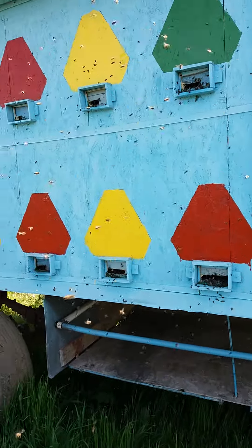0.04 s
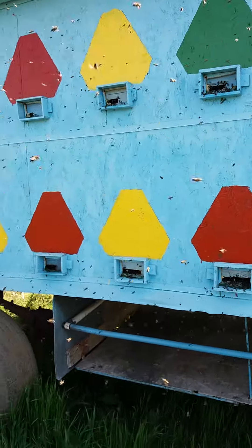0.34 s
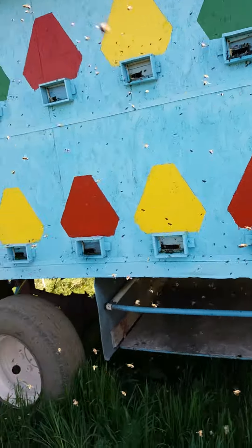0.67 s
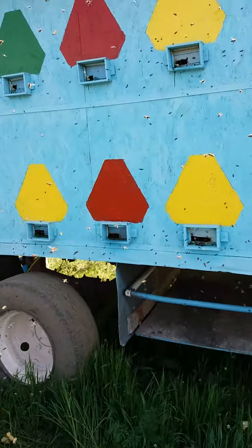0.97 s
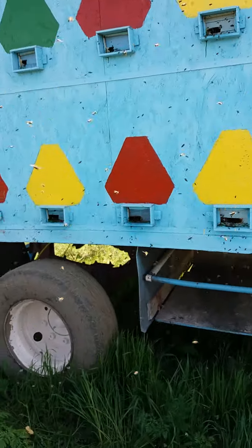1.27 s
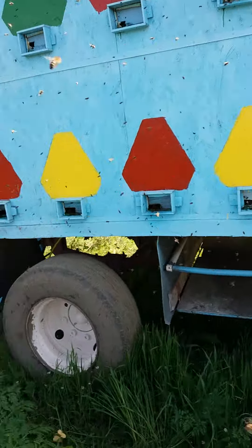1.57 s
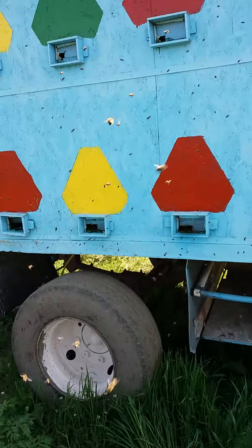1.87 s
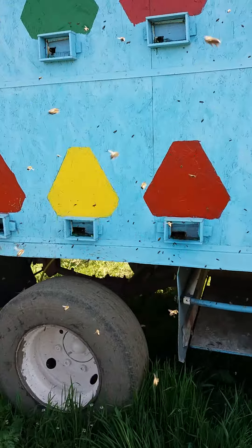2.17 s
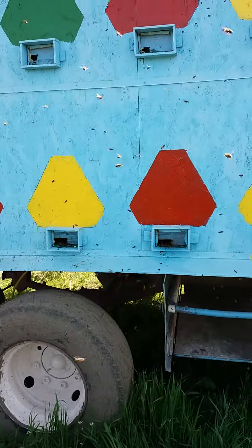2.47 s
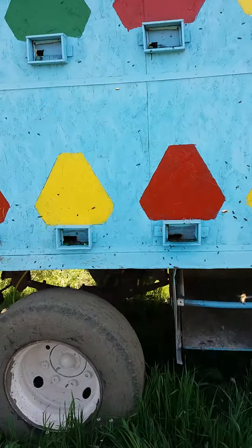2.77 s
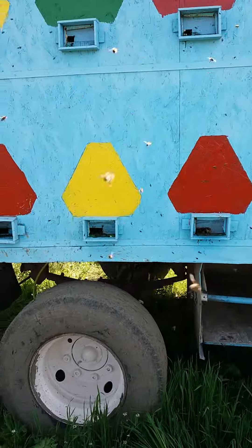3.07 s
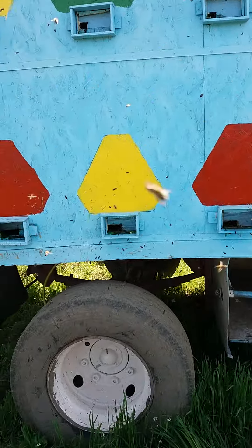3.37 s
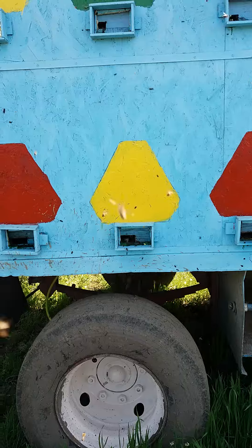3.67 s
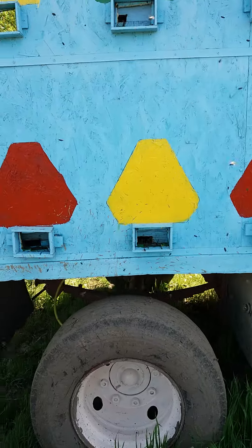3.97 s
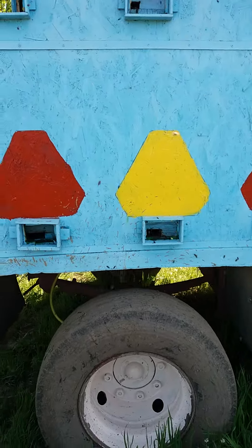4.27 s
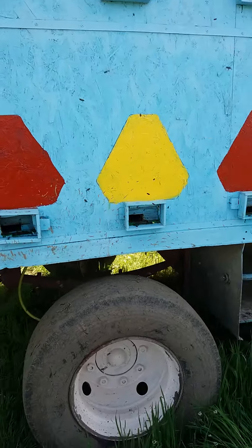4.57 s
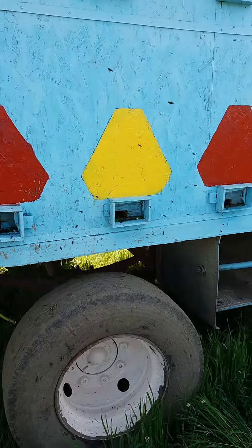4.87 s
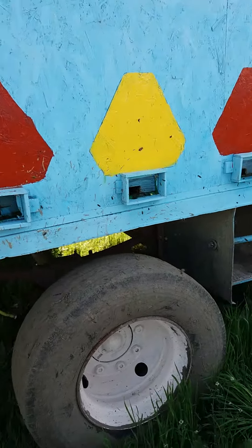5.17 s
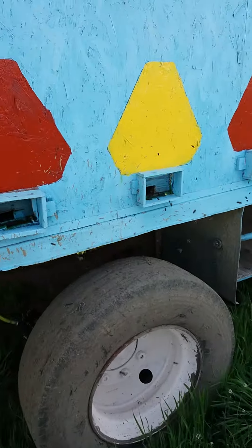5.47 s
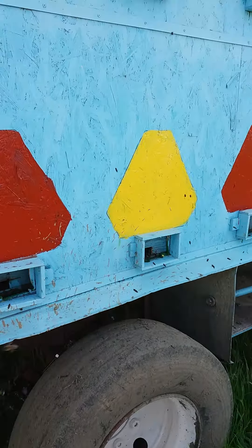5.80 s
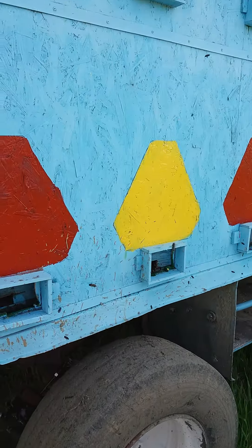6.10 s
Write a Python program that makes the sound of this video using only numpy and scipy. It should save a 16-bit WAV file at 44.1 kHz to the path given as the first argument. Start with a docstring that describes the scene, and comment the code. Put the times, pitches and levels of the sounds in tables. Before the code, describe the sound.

Many honeybees buzz throughout, around hive entrances in an open field, their wingbeats merging into one soft, wavering hum with a raspy edge. The buzz is fullest from about 0.8 to 2 seconds, then slowly thins and dulls toward 5 seconds, lifts slightly at 5.5 and eases again.

Handling noises sit right on the microphone. A short knock at 0.4 seconds leads to a deep thump at 0.6, by far the loudest sound. A sharp click comes at 1.4 seconds, a fainter one at 1.8, and a dull knock at 2.8. Between 4.2 and 4.6 seconds the case gives a quick cluster of clicks, the sharpest at 4.4. A few light knocks follow from 5.4 seconds to the end, at about 6. Very faint finger slides occur in between. Underneath are a light wind rumble with small gusts and a faint steady hiss.

```python
"""Honeybees swarm at the entrances of a hive trailer in an open field, heard from a hand-held camera.
Dozens of wingbeats blend into one hum, which thins as the camera moves along the trailer.
Fingers slide and knock on the camera, once with a deep thump, and its case clicks and rings.
Behind it all: light wind on the microphone and a steady hiss."""
import sys
import numpy as np
from scipy import signal
from scipy.fft import rfft, irfft, next_fast_len
from scipy.io import wavfile
from scipy.ndimage import uniform_filter1d

SR = 44100
rng = np.random.default_rng(int(sys.argv[2]) if len(sys.argv) > 2 else 0)


def transcribe(u):
    """Save the signal u as a 16-bit wav file named by the first command-line argument.

    u: samples, shape (n,) or (channels, n), limited to [-1, 1]; the rate is SR.
    q: integer samples, one column per channel.
    """
    v = np.clip(np.atleast_2d(u).T, -1, 1)
    q = np.round(v * 32767).astype(np.int16)
    wavfile.write(sys.argv[1], SR, q)


N = 270766
TIME_S = np.arange(N) / SR


def gain_of(db):
    """dB to amplitude."""
    return 10 ** (np.asarray(db) / 20)


def unit_rms(x):
    """Scale to rms 1."""
    return x / np.sqrt(np.mean(x ** 2) + 1e-20)


def bell(x, sigma):
    """Gaussian, peak 1."""
    return np.exp(-.5 * (x / sigma) ** 2)


def gain_at(spectrum, hz):
    """Amplitude of a dB spectrum, interpolated over log frequency."""
    points_hz, points_db = np.transpose(spectrum)
    return gain_of(np.interp(np.log(hz + 1), np.log(points_hz + 1), points_db))


def add(mix, at_s, sound):
    """Mix in at at_s."""
    part = mix[round(at_s * SR):][:len(sound)]
    part += sound[:len(part)]


def cut(x, hz, kind, order=2):
    """Causal Butterworth low- or high-pass."""
    return signal.sosfilt(signal.butter(order, hz, kind, fs=SR, output="sos"), x)


def drift(t, slow_hz, fast_hz, count=14):
    """Random wander from summed sines, rms 1."""
    hz = np.geomspace(slow_hz, fast_hz, count)[:, None]
    sines = np.sin(2 * np.pi * (hz * t + rng.random((count, 1))))
    return unit_rms((sines / np.sqrt(hz)).sum(0))


def noise(spectrum):
    """Coloured noise, rms 1."""
    size = next_fast_len(N)
    colour = gain_at(spectrum, np.fft.rfftfreq(size, 1 / SR))
    return unit_rms(irfft(rfft(rng.standard_normal(size)) * colour, size)[:N])


# Hiss spectrum: f/Hz, relative density/dB
HISS_SPECTRUM = [(500, 0), (2000, 6.5), (3100, 6), (4500, 1.5), (6000, -6.5), (7500, -8.5), (9500, -6),
                 (12000, -1.5), (14000, 1), (15500, 2)]

def hiss(level_db=-72.0):
    """Steady hiss of the microphone and of grass rustling in the distance."""
    return gain_of(level_db) * noise(HISS_SPECTRUM)


# Wind spectrum: f/Hz, relative density/dB
WIND_SPECTRUM = [(20, -27), (35, -24), (50, -5.5), (68, 0.5), (100, -3), (140, -4), (250, -10.5),
                 (600, -16.5), (2000, -51.5)]
# Gusts: t/s, rise/dB
WIND_GUSTS = [(0.02, 7.5), (0.6, 6), (0.83, 4.5), (1.7, 3), (2.75, 2), (5.36, 3.5), (6.13, 5)]

def wind(base_db=-60.3, flutter_db=1.74, gust_sigma_s=0.072):
    """Breeze on the microphone: uneven rumble with a few gusts."""
    t = TIME_S[::256]
    gusts_db = sum(rise_db * bell(t - at_s, gust_sigma_s) for at_s, rise_db in WIND_GUSTS)
    level_db = base_db + gusts_db + flutter_db * drift(t, 1.4, 9.7)
    return noise(WIND_SPECTRUM) * gain_of(np.interp(TIME_S, t, level_db))


# Friction spectrum: f/Hz, relative density/dB
RUB_SPECTRUM = [(300, -14), (800, 5), (2000, 9.5), (4500, 0), (7000, -18), (10000, -17), (13000, -2),
                (15500, -0.5)]
# Fingertip slides: t/s, gain/dB, sigma/s, fizz gain/dB
FINGER_SLIDES = [(.53, -78, 0.033, 4), (1.44, -73, .05, 0), (1.66, -76, 0.028, 3), (2.492, -70.5, .02, -6),
                 (2.68, -76, .02, 4), (2.955, -70.5, .025, 0), (4.17, -76.5, 0.13, 1), (4.39, -78, .05, 2),
                 (4.54, -64, .03, 6), (4.67, -72, .02, -6), (5.23, -71, 0.088, -14), (5.54, -72, .05, -8),
                 (5.85, -73.5, .04, -14)]

def slides(slips_per_s=900, uneven_db=4.0, fizz_hz=7000):
    """Skin sticks and slips on the case in tiny ticks; a dry touch fizzes more."""
    onsets = rng.random(N) < slips_per_s / SR
    slips = onsets * gain_of(uneven_db * np.minimum(rng.exponential(1, N), 4))
    rub = unit_rms(noise(RUB_SPECTRUM) * uniform_filter1d(slips, size=30))
    body = cut(rub, fizz_hz, "low", order=4)
    fizz = cut(rub, fizz_hz, "high", order=4)
    return sum(gain_of(db) * bell(TIME_S - at_s, sigma_s) * (body + gain_of(fizz_db) * fizz)
               for at_s, db, sigma_s, fizz_db in FINGER_SLIDES)


# Case modes: f/Hz, relative level/dB, t60/s
CASE_MODES = [(814, -2.5, 0.019), (1030, -6, 0.014), (1466, -5.5, 0.015), (2010, -8.5, 0.011),
              (2960, -4, 0.0056), (4210, -6.5, 0.0051), (5120, -10.5, 0.0053), (10300, -4, 0.0023),
              (11800, -4, 0.0029), (14260, -2, 0.0039)]

def click(ring_db, centre_hz, sigma_oct, spill=0.13, tail_db=-13.5, tail_t60_s=0.063):
    """The case snaps and rings; the trailer wall scatters a little back."""
    t = TIME_S[:SR // 8]
    hz, mode_db, t60_s = np.transpose(CASE_MODES)[:, :, None]
    drive = spill + bell(np.log2(hz / centre_hz), sigma_oct)
    sign = (-1) ** np.arange(len(CASE_MODES))[:, None]
    modes = gain_of(mode_db - 60 * t / t60_s) * np.sin(2 * np.pi * hz * t)
    ring = (sign * drive * modes).sum(0)
    scatter = rng.standard_normal(len(t)) * gain_of(-60 * t / tail_t60_s)
    tail = signal.fftconvolve(ring, scatter)[:len(t)]
    return gain_of(ring_db) * (ring / abs(ring).max() + gain_of(tail_db) * tail / abs(tail).max())


def knock(peak_db, bright_hz, push_s, bass_hz=95, top_hz=5600):
    """A brief push on the microphone, which passes no deep bass and so swings back."""
    t = TIME_S[:SR // 8]
    push = cut(np.exp(-t / push_s), bright_hz, "low")
    push = cut(push, top_hz, "low", order=6)
    swing = cut(push, bass_hz, "high", order=4)
    return -gain_of(peak_db) * swing / abs(swing).max()


def thump(gain_db=-10, start_hz=280, end_hz=58, sag_s=.0056, decay_s=.0128, bass_hz=48):
    """The hand lands with a deep knock that rings a few cycles, its pitch sinking as it dies."""
    t = TIME_S[:SR // 8]
    cycles = np.cumsum(end_hz + (start_hz - end_hz) * np.exp(-t / sag_s)) / SR
    envelope = np.sqrt(t / decay_s) * np.exp(-(t / decay_s) ** 1.5)
    shake = cut(envelope * np.sin(2 * np.pi * cycles), bass_hz, "high")
    return knock(peak_db=-25.0, bright_hz=850, push_s=0.001) - gain_of(gain_db) * shake


# Finger knocks: t/s, peak/dB, low-pass/Hz, push decay/s
FINGER_KNOCKS = [(0.405, -28.5, 870, 0.0011), (0.631, -26.5, 1490, 0.00077), (1.393, -35, 705, 0.00025),
                 (2.7638, -29.5, 1500, 0.0005), (4.2184, -40.5, 454, 0.0003), (4.531, -33, 1500, 0.00018),
                 (5.328, -48, 120, .005), (5.449, -37.5, 900, 0.00096), (5.8665, -37, 1000, 0.00049),
                 (5.9658, -33, 1200, 0.00058), (6.1283, -35.5, 915, 0.0024)]
# Case clicks: t/s, ring peak/dB, drive centre/Hz, drive sigma/oct
CASE_CLICKS = [(.3595, -58, 14000, .2), (1.3914, -38.5, 1630, 0.41), (1.8268, -46.5, 3900, .5),
               (2.5300, -56, 11000, .2), (2.5845, -56, 13000, .3), (4.2566, -39.5, 2900, 0.29),
               (4.3475, -51, 14000, .4), (4.3945, -57, 13000, .6), (4.412, -31.5, 2420, 1),
               (4.54, -37, 1190, 0.79), (4.5454, -51, 6000, 2.5), (4.5584, -44.5, 6500, 0.29)]

def handling(thump_at_s=.6387):
    """Hand on the camera: slides, knocks, clicks, one thump."""
    mix = slides()
    for at_s, *blow in FINGER_KNOCKS:
        add(mix, at_s, knock(*blow))
    for at_s, *snap in CASE_CLICKS:
        add(mix, at_s, click(*snap))
    add(mix, thump_at_s, thump())
    return mix


# Wingbeat harmonic envelope: f/Hz, relative level/dB
WING_SPECTRUM = [(170, -5), (250, -.5), (370, -1.5), (500, -3.5), (630, -12), (760, -9.5), (1000, -11.5),
                 (1120, -10), (1270, -10), (1600, -19.5), (2100, -26), (3100, -33), (4500, -43),
                 (6500, -53)]

def bee(beat_hz, waver=.034, swell_db=3.0, harmonics=30, size=4096):
    """Each bee's wingbeat slowly crossfades between two waveforms; pitch, distance and blend wander."""
    t = np.linspace(0, TIME_S[-1], size // 4)
    pitch_hz = beat_hz * (1 + waver * drift(t, .4, 14))
    cycles = np.cumsum(np.interp(TIME_S, t, pitch_hz)) / SR
    index = (cycles % 1 * size).astype(int)
    amplitudes = gain_at(WING_SPECTRUM, beat_hz * np.arange(1, harmonics + 1))
    partials = amplitudes * np.exp(2j * np.pi * rng.random((2, harmonics)))
    tone_a, tone_b = irfft(np.pad(partials, ((0, 0), (1, 0))), size) * size  # one cycle each
    nearness = unit_rms(gain_of(swell_db * drift(t, 0.7004, 7)))
    blend_rad = drift(t, 0.3016, 4)
    a_gain = np.interp(TIME_S, t, nearness * np.cos(blend_rad))
    b_gain = np.interp(TIME_S, t, nearness * np.sin(blend_rad))
    return tone_a[index] * a_gain + tone_b[index] * b_gain


def flock(beat_hz, spread_hz, level_db, bees=22):
    """Bees with wingbeats in a bell around one pitch."""
    offsets = unit_rms(np.arcsin(np.linspace(-1, 1, bees + 2)[1:-1]))
    return gain_of(level_db) * unit_rms(sum(bee(beat_hz + spread_hz * offset) for offset in offsets))


# Kinds of flight: wingbeat/Hz, spread/Hz, relative level/dB
FORAGING = (248, 12, 0)
HOVERING = (204, 26, -1.46)
# Nearness to the entrances: t/s, rasp level before trim/dB
NEARNESS = [(0.0, -59.5), (0.31, -58.5), (0.79, -56), (1.86, -55), (4.94, -63), (5.47, -60.5),
            (6.14, -65.5)]

def swarm(split_hz=570, hum_db=-51.5, hum_slope=.6, pivot_db=-59, rasp_trim_db=0.7):
    """All bees: the high rasp fades faster with distance than the low hum."""
    near_db = np.interp(TIME_S, *np.transpose(NEARNESS))
    wings = flock(*FORAGING) + flock(*HOVERING)
    lows = cut(wings, split_hz, "low", order=4)
    lows = cut(lows[::-1], split_hz, "low", order=4)[::-1]  # reverse pass: zero phase
    hum = unit_rms(lows) * gain_of(hum_db + hum_slope * (near_db - pivot_db))
    rasp = unit_rms(wings - lows) * gain_of(near_db + rasp_trim_db)
    return hum + rasp


def scene():
    """Bees, wind, hiss and hand; mono."""
    return (swarm() + wind() + hiss() + handling())[None]


def record(dry):
    """Band limit at 15650 Hz."""
    lowpass = signal.firwin(511, 15650, window=("kaiser", 9), fs=SR)
    return signal.oaconvolve(dry, lowpass[None], "same")


dry = scene()
out = record(dry)
transcribe(out)
```